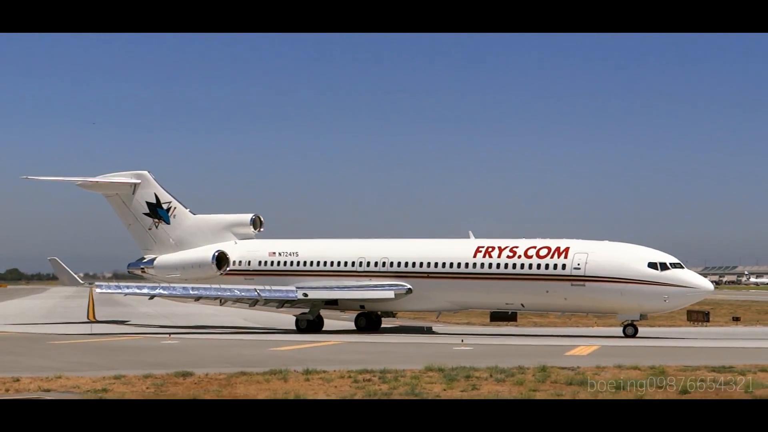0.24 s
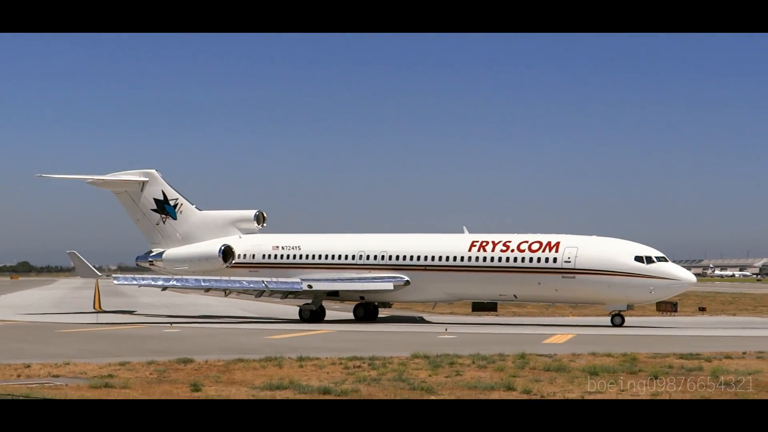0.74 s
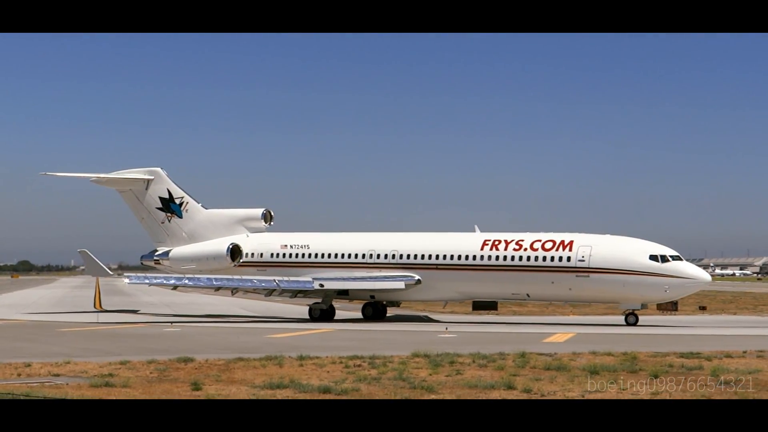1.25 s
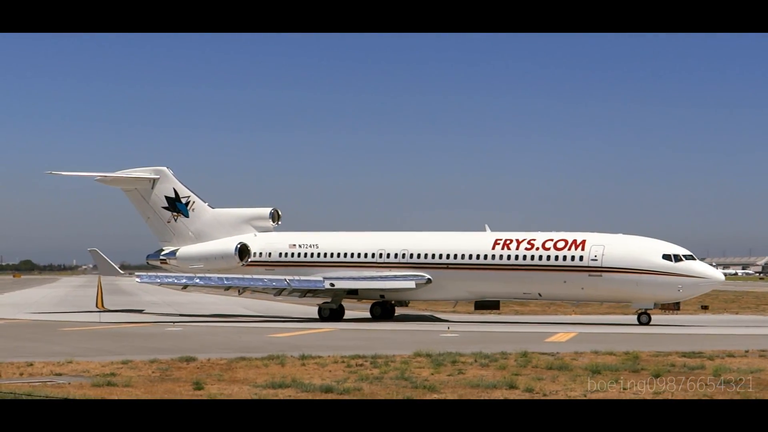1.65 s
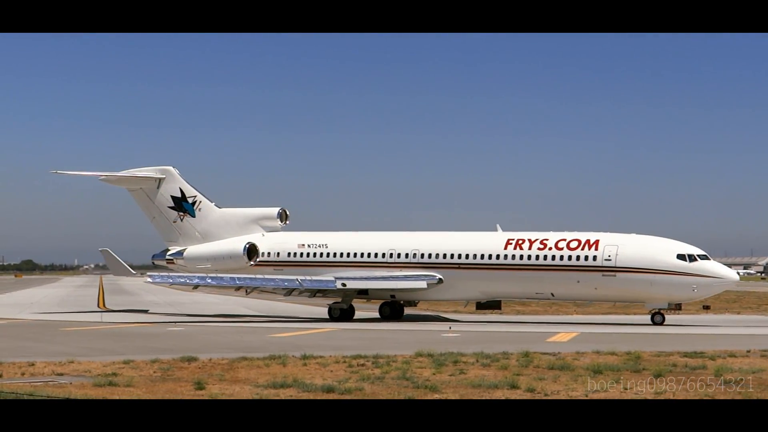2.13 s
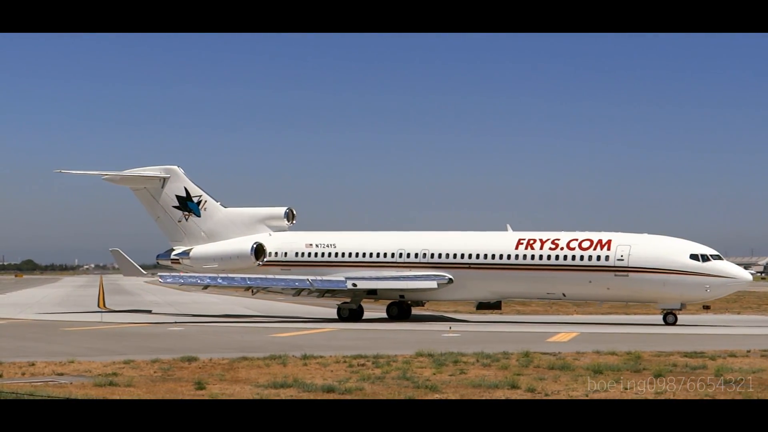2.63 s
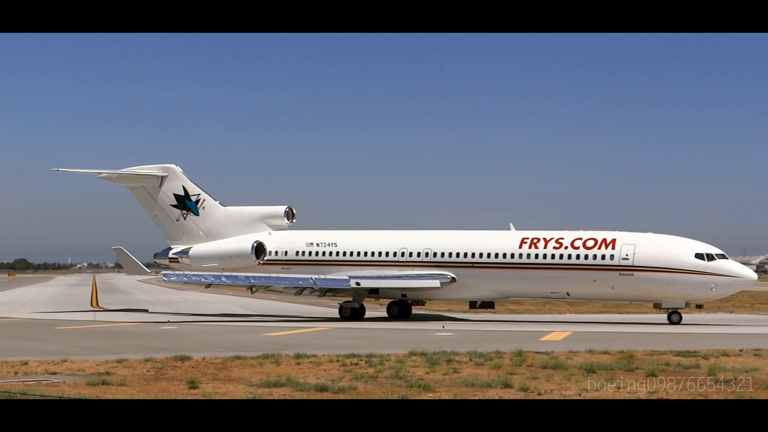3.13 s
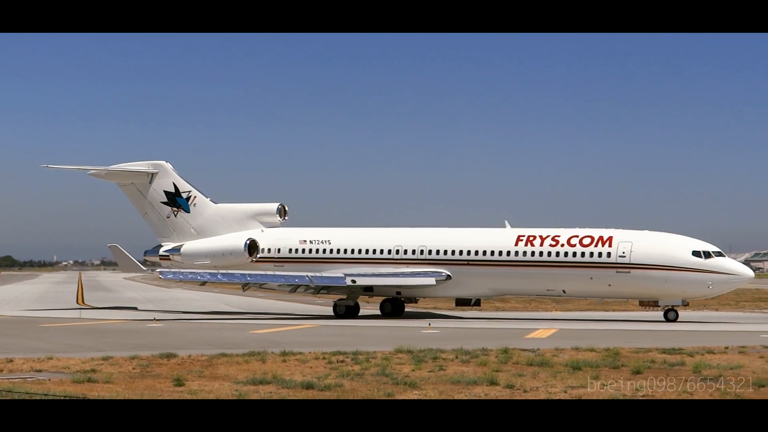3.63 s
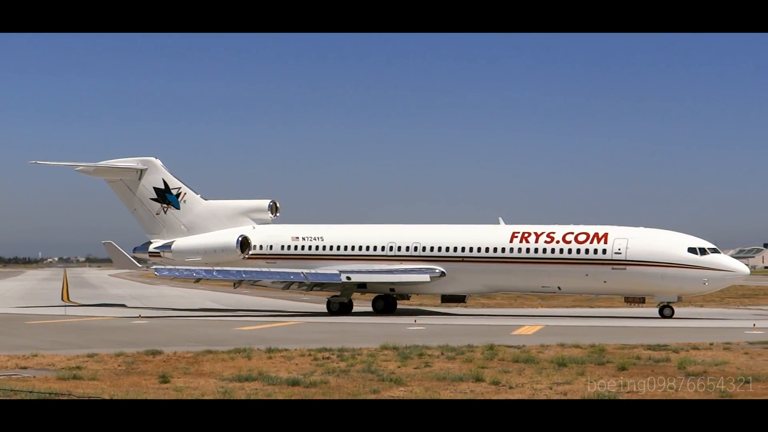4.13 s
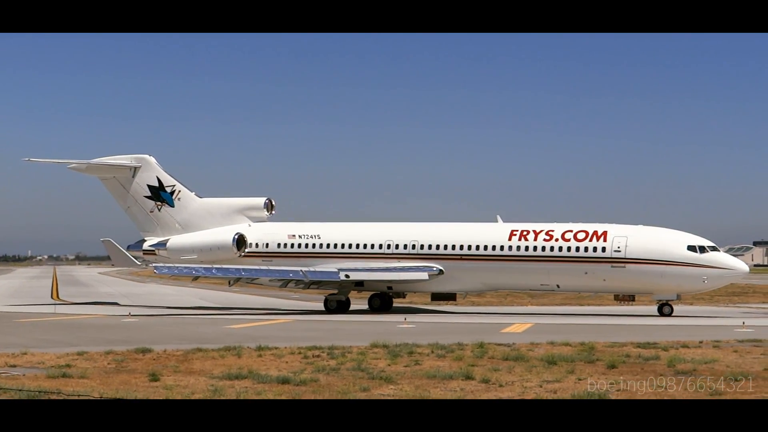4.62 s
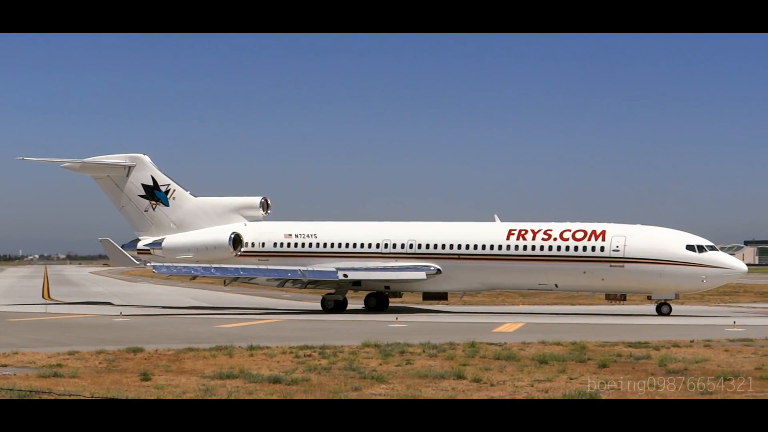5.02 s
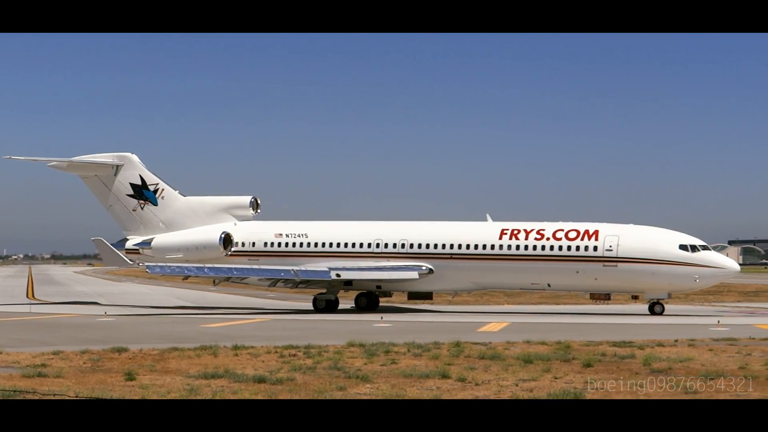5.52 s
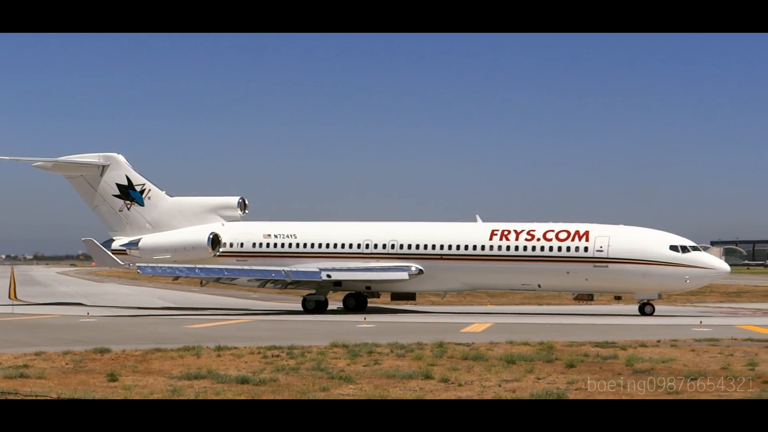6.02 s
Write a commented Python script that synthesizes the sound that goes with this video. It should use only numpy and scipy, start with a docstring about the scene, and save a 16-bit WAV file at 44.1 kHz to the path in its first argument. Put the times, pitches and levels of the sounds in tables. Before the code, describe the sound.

Idling jet engines whine without a break as an airliner rolls slowly along a taxiway, some way from the microphone in the open air. Several high tones hold their pitch but waver in strength, with brief whistles flaring among them. Underneath run an even exhaust roar and airy hiss, with a faint upward sweep early on. One whine grows stronger at the close.

```python
"""A three-engined jet airliner taxis slowly past at idle, some way off across open ground.
From the start its fans sing a chord of blade tones that twinkle in the hot air, over intake rush, hiss
and exhaust roar. For two seconds the ground echo's lag shrinks, sliding a comb up through the noise.
Beams of whine keep sweeping over the listener: the high tone crests near 3 s and again from 4.5 s,
and the middle one swells at the end. Throughout, the camera's gain control holds the sum nearly level."""
import sys
import numpy as np
from scipy import signal
from scipy.fft import rfft, irfft, next_fast_len
from scipy.io import wavfile
from scipy.ndimage import uniform_filter1d, map_coordinates

SR = 44100
rng = np.random.default_rng(int(sys.argv[2]) if len(sys.argv) > 2 else 0)


def unload_wav(signal):
    """Save mono or channel-first audio to the path in sys.argv[1] as 16-bit WAV at rate SR, clipped to [-1, 1]."""
    wavfile.write(
        sys.argv[1],
        SR,
        np.round(np.clip(np.atleast_2d(signal).T, -1, 1) * 32767).astype(np.int16),
    )


N = 276066

# colours of the exhaust roar, intake rush, blade wakes and hiss: f/Hz, level/dB
ROAR_SPECTRUM = [(20, -33.5), (45, -26), (90, -12.5), (120, -4.5), (165, -2.5), (220, -8), (275, -8.5),
                 (335, -1), (540, 4), (670, 0.5), (900, 1), (1080, -3.5), (1400, -2.5), (2200, -44)]
RUSH_SPECTRUM = [(800, -39), (1150, -7), (1350, -6.5), (1550, -5), (1800, 0), (2100, 0), (2400, 3),
                 (2700, -1), (2950, -3), (3300, -10.5), (4200, -47)]
WAKE_SPECTRUM = [(2300, -28.5), (2950, 0.5), (3300, 3), (3600, 2.5), (3900, -1), (4250, -3.5), (4600, -6),
                 (4900, -10.5), (5400, -28), (6500, -46)]
HISS_SPECTRUM = [(3500, -18.5), (4600, 4), (5200, 2), (5900, -1), (6400, -4.5), (7000, -8), (8000, -11),
                 (9000, -18), (10700, -23.5), (11600, -41.5), (12400, -43), (14000, -66.5)]
# swells of the exhaust roar, blade wakes and hiss: t/s, level/dB
ROAR_SWELL = [(0.0, -32), (0.48, -28), (0.92, -32.5), (4.39, -31), (4.74, -29), (5.98, -30.0),
              (6.26, -33.5)]
WAKE_SWELL = [(0.0, -23.5), (1.2, -21.7), (1.52, -23.9), (2.79, -20.5), (3.31, -27), (3.79, -23.1),
              (5.02, -25.4), (5.34, -23.2), (5.78, -27), (6.26, -20)]
HISS_SWELL = [(0.0, -31.5), (0.48, -35), (0.92, -31), (1.17, -31), (1.48, -35.5), (2.19, -29.5),
              (2.79, -32.5), (2.99, -34.5), (3.07, -32), (3.65, -32), (4.51, -35.5), (4.82, -38),
              (4.98, -33), (5.5, -32), (5.9, -37.5), (6.06, -35.5), (6.26, -31)]
# fan shaft's turning rate as heard: t/s, f/Hz
SHAFT_SPEED = [(0, 49.88), (1.8, 49.88), (3.1, 49.95), (5.2, 50.01), (6.26, 50.01)]
# faint fan and compressor tones: multiple of the shaft speed, level/dB
FAINT_BLADE_TONES = [(27, -49.5), (81, -49.5), (94, -48), (107, -51), (108, -48), (121, -58), (134, -53)]
# faint fixed-pitch tones of the cores and their accessories: f/Hz, level/dB
FAINT_CORE_TONES = [(1341, -41.5), (1622, -41), (2207, -35), (2444, -46), (2543, -48), (2600, -33.5),
                    (3093, -37.5), (3232, -44.5), (3784, -43.5), (3890, -45), (4414, -45), (4440, -43.5),
                    (5124, -48), (5987, -59.5), (6386, -61), (7961, -60)]
# whistles that flare as a narrow beam sweeps past: t/s, f/Hz, half length/s, level/dB
WHISTLE_FLARES = [(0.088, 2207, 0.22, -25), (.15, 5388, 0.18, -34), (.85, 5388, .15, -34.5),
                  (0.903, 4440, 0.8, -32), (1.04, 4539, 0.093, -30), (1.535, 1622, 0.22, -30.5),
                  (1.754, 4539, 0.1, -25), (2.25, 5360, .3, -37), (3.546, 1622, 0.2, -32),
                  (3.55, 2207, .3, -29), (4.35, 4547, 0.13, -29.5), (5.002, 4551, 0.36, -32),
                  (5.44, 4510, 0.073, -28.5), (6.05, 4551, 0.16, -34)]
# beams of the gears, compressor, second fan stage, middle and high blade tones: t/s, level/dB
GEAR_BEAM = [(0.0, -38.1), (1.59, -26.3), (2.39, -33), (3.07, -27), (3.51, -32), (4.86, -23.9),
             (6.02, -29.5), (6.26, -34)]
COMPRESSOR_BEAM = [(0.0, -55), (0.72, -35.8), (1.44, -27.5), (1.71, -39.2), (1.91, -21.5), (4.19, -29.5),
                   (4.55, -19.4), (4.82, -28), (6.26, -32.5)]
SECOND_STAGE_BEAM = [(0.0, -33), (0.4, -24.5), (0.56, -31.5), (1.16, -27), (1.95, -35.5), (2.07, -50),
                     (2.39, -22.4), (2.79, -36), (3.03, -27.4), (3.43, -31), (4.55, -17.9), (5.18, -27.5),
                     (5.98, -21.4), (6.26, -28)]
MIDDLE_BLADE_BEAM = [(0.0, -22.5), (0.48, -18.5), (0.68, -22.5), (0.92, -21.5), (1.08, -28), (1.4, -35),
                     (1.56, -23.5), (1.75, -26), (1.87, -17), (2.23, -15), (2.59, -22.5), (2.75, -17.9),
                     (2.91, -21.5), (2.99, -17), (3.19, -22.8), (3.31, -21), (3.43, -31), (3.62, -24.5),
                     (3.83, -23), (4.35, -35.5), (4.43, -22.6), (6.18, -10), (6.26, -13.5)]
HIGH_BLADE_BEAM = [(0.0, -23), (0.24, -17.5), (0.92, -31.5), (1.04, -22.5), (1.32, -14.5), (1.44, -21),
                   (1.91, -15.5), (1.99, -22.5), (2.12, -16), (2.21, -25), (2.29, -16.5), (2.59, -12.9),
                   (2.75, -16), (2.95, -10.5), (3.11, -17.5), (3.43, -14), (3.67, -29.3), (4.03, -21),
                   (4.51, -12.5), (4.7, -12), (4.86, -18.5), (5.1, -11), (5.46, -20), (5.5, -28.3),
                   (5.74, -13.5), (5.9, -16.7), (6.02, -10.5), (6.14, -17.5), (6.26, -34)]
# stereo width, the EQ on the scattered sound in the side channel: f/Hz, level/dB
SIDE_EQ = [(25, -11.5), (60, -17), (200, -30), (500, -23), (2500, -20.5), (4500, -15), (8000, -14),
           (10000, -13.5), (12000, -23)]


def undb(db):
    """Decibels to gain."""
    return 10 ** (np.asarray(db) / 20)


def unit(x):
    """Scale to an rms of one."""
    return x / np.sqrt(np.mean(x ** 2))


def curve(table):
    """Automation line through (t/s, value) points, one value per sample."""
    return np.interp(np.arange(N) / SR, *np.transpose(table))


def colour(x, spectrum):
    """EQ through (f/Hz, level/dB) points joined on a log-frequency axis."""
    hz, db = np.transpose(spectrum)
    size = next_fast_len(N + SR // 10, real=True)
    bin_hz = np.maximum(np.arange(size // 2 + 1) * SR / size, 1)
    gain = undb(np.interp(np.log(bin_hz), np.log(hz), db))
    return irfft(rfft(x, size) * gain, size)[:N]


def drift(rate_hz, size=8192):
    """Smooth random modulator with an rms of one, moving at up to about rate_hz."""
    hz = np.arange(size // 2 + 1) * SR / N
    slow = unit(irfft(rfft(rng.standard_normal(size)) / (1 + (hz / rate_hz) ** 2)))
    return np.interp(np.arange(N) / N, np.arange(size) / size, slow)


def turbulence(spectrum, flutter_db, flutter_hz):
    """Churning air: coloured noise whose level flutters."""
    return unit(colour(rng.standard_normal(N), spectrum)) * undb(flutter_db * drift(flutter_hz))


def whine(hz, twinkle, skirt_db, twinkle_hz=21, skirt_hz=100):
    """A tone: eddies in the air bend its level and phase, unsteady inflow gives it a noisy skirt."""
    phase = 2 * np.pi * (np.cumsum(np.broadcast_to(hz, N)) / SR + rng.random())
    along, across = (twinkle * drift(twinkle_hz) + undb(skirt_db) * drift(skirt_hz) for _ in range(2))
    return unit((1 + along) * np.cos(phase) + across * np.sin(phase))


def ground_echo(x, lag_ms, share):
    """Comb filter: the grazing bounce off the ground arrives a little late and upside down."""
    delayed_index = np.arange(N) - lag_ms * SR / 1000
    return unit(x - share * map_coordinates(x, [delayed_index], order=3, mode="mirror"))


def blade_buzz(shaft_hz, count=260, size=4096):
    """Unequal blades stamp the same pattern on every turn: dense shaft harmonics from each engine."""
    buzz = 0
    for detune in (1, .997, .993):
        harmonics = rng.standard_normal(count) * np.exp(2j * np.pi * rng.random(count))
        turns = np.cumsum(shaft_hz * detune) / SR
        pattern = np.interp(turns % 1, np.arange(size) / size, irfft(harmonics, size))
        buzz = buzz + unit(pattern) * undb(4.4 * drift(1.5))
    return buzz


def airflow(shaft_hz):
    """The bed: droning exhaust roar, intake rush, blade wakes and buzzy hiss, each with a ground echo."""
    extra_lag, shrink_s = 0.11, 1.95  # the lag shrinks as the aircraft moves, then holds
    low_share, treble_share = .45, .32  # rough ground returns less of the treble
    stretch = 1 + extra_lag * np.maximum(1 - np.arange(N) / SR / shrink_s, 0)
    jostle_ms = .015 * drift(4)  # warm air over the tarmac jostles the path of the bounce
    low_ms, high_ms = 1.67 * stretch + jostle_ms, 1.595 * stretch + jostle_ms
    exhaust = turbulence(ROAR_SPECTRUM, flutter_db=0.29, flutter_hz=20)
    drone = undb(-24) * whine(116, twinkle=.4, twinkle_hz=4, skirt_db=-23.5, skirt_hz=15)
    fizz = turbulence(HISS_SPECTRUM, flutter_db=0.72, flutter_hz=24)
    buzz = undb(-4.5) * unit(colour(blade_buzz(shaft_hz), HISS_SPECTRUM))
    intake = turbulence(RUSH_SPECTRUM, flutter_db=0.79, flutter_hz=22)
    churn = turbulence(WAKE_SPECTRUM, flutter_db=1.0, flutter_hz=21)
    sizzle = (fizz + buzz) * undb(1.1 * drift(26))
    roar = undb(curve(ROAR_SWELL)) * ground_echo(exhaust + drone, low_ms, low_share)
    rush = undb(-22.5) * ground_echo(intake, low_ms, low_share)
    wakes = undb(curve(WAKE_SWELL)) * ground_echo(churn, (low_ms + high_ms) / 2, treble_share)
    hiss = undb(curve(HISS_SWELL)) * ground_echo(sizzle, high_ms, treble_share)
    return roar + rush + wakes + hiss


def faint_tones(shaft_hz):
    """Weaker blade rows and core tones, fading in and out as the three engines interfere."""
    blades = sum(undb(db) * whine(k * shaft_hz, twinkle=0.86, twinkle_hz=1.5, skirt_db=-26, skirt_hz=30)
                 for k, db in FAINT_BLADE_TONES)
    cores = sum(undb(db) * whine(hz, twinkle=0.78, twinkle_hz=2, skirt_db=-23, skirt_hz=30)
                for hz, db in FAINT_CORE_TONES)
    return blades + cores


def gears():
    """The accessory gears whine at a steady pitch, swelling as their beam passes."""
    return undb(curve(GEAR_BEAM)) * whine(1891.7, twinkle=0.18, twinkle_hz=12, skirt_db=-25, skirt_hz=60)


def whistle_flares():
    """Narrow beams of whistle sweep over the listener, each swelling and fading in a bell shape."""
    t = np.arange(N) / SR
    whistles = 0
    for peak_s, hz, half_s, db in WHISTLE_FLARES:
        swell = undb(db) * np.exp(-((t - peak_s) / half_s) ** 2)
        whistles = whistles + swell * whine(hz, twinkle=0.3, skirt_db=-15.5, skirt_hz=40)
    return whistles


def fans(shaft_hz):
    """The lead chord: blade tones beamed in their own lobes; a whistle rides the compressor's beam."""
    high = undb(curve(HIGH_BLADE_BEAM)) * whine(67 * shaft_hz, twinkle=0.16, skirt_db=-23)
    middle = undb(curve(MIDDLE_BLADE_BEAM)) * whine(54 * shaft_hz, twinkle=0.16, skirt_db=-17)
    second_stage = undb(curve(SECOND_STAGE_BEAM)) * whine(40 * shaft_hz, twinkle=0.17, skirt_db=-22)
    compressor = whine(64 * shaft_hz, twinkle=0.34, skirt_db=-23.5)
    whistle = undb(-13) * whine(91 * shaft_hz, twinkle=0.34, skirt_db=-17.5)
    return high + middle + second_stage + undb(curve(COMPRESSOR_BEAM)) * (compressor + whistle)


def scene():
    """The aircraft sits dead centre; a little scattered sound widens it."""
    shaft_hz = curve(SHAFT_SPEED)
    mid = fans(shaft_hz) + gears() + whistle_flares() + faint_tones(shaft_hz) + airflow(shaft_hz)
    side = colour(airflow(shaft_hz) + undb(-7.5) * fans(shaft_hz), SIDE_EQ)
    return np.array([mid + side, mid - side])


def record(dry):
    """Gain control ducks the mix as a whine swells; peaks are soft-clipped and the top is cut."""
    pivot_db, squeeze, window_s = -13, .72, .03
    ceiling, top_hz = .75, 12500
    power = uniform_filter1d(np.mean(dry ** 2, axis=0), int(window_s * SR))
    levelled = dry * (undb(pivot_db) / np.sqrt(power)) ** squeeze
    rounded = levelled / (1 + (levelled / ceiling) ** 10) ** .1
    high_cut = signal.ellip(8, .2, 70, top_hz, fs=SR, output="sos")
    return signal.sosfilt(high_cut, rounded)


dry = scene()
out = record(dry)
unload_wav(out)
```